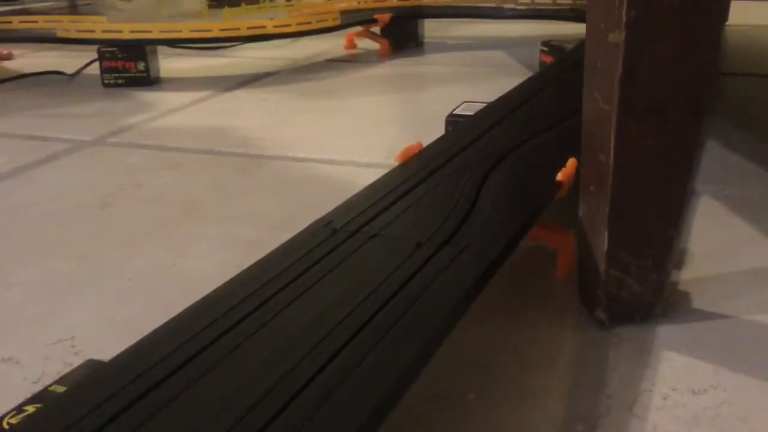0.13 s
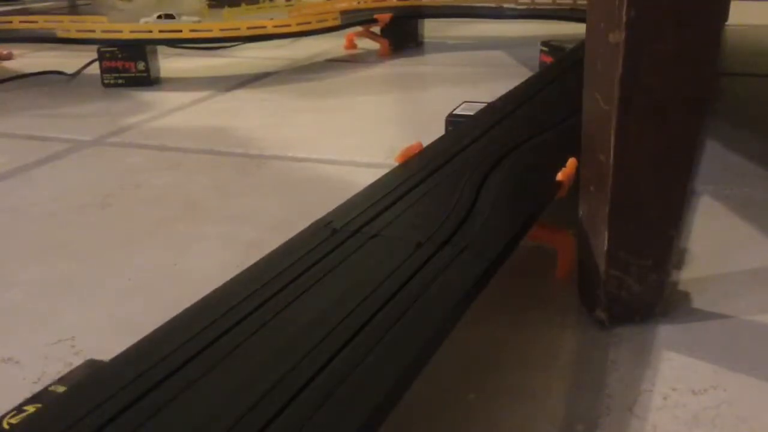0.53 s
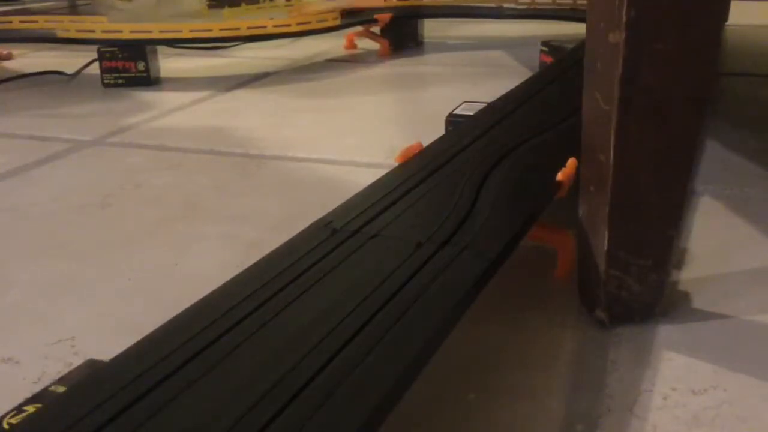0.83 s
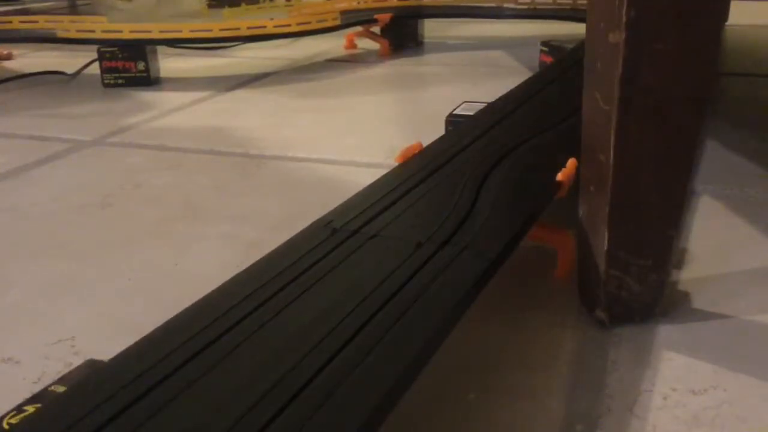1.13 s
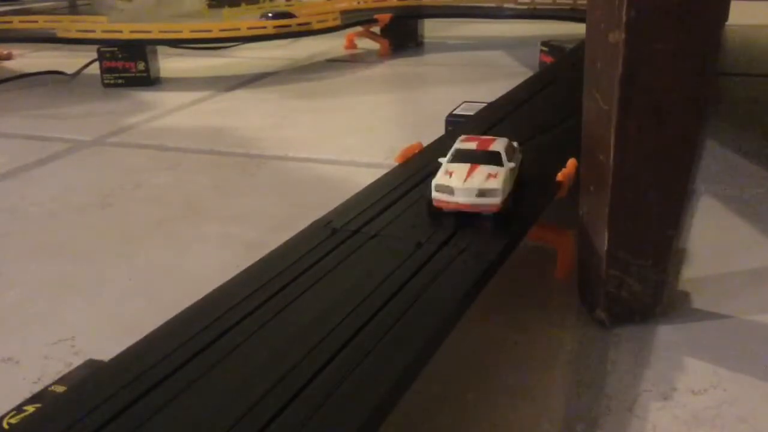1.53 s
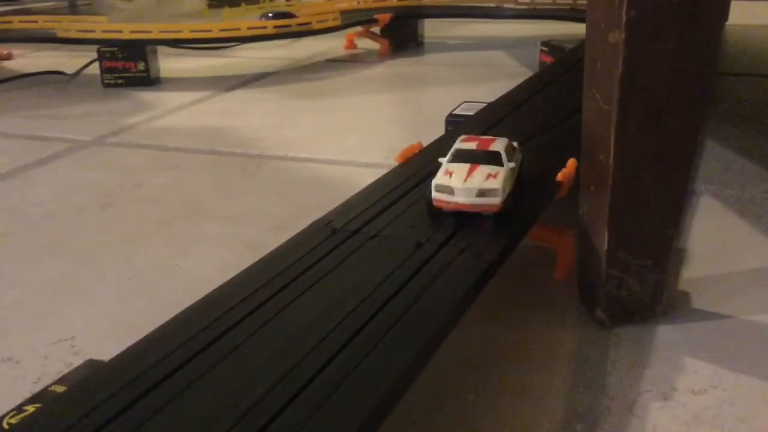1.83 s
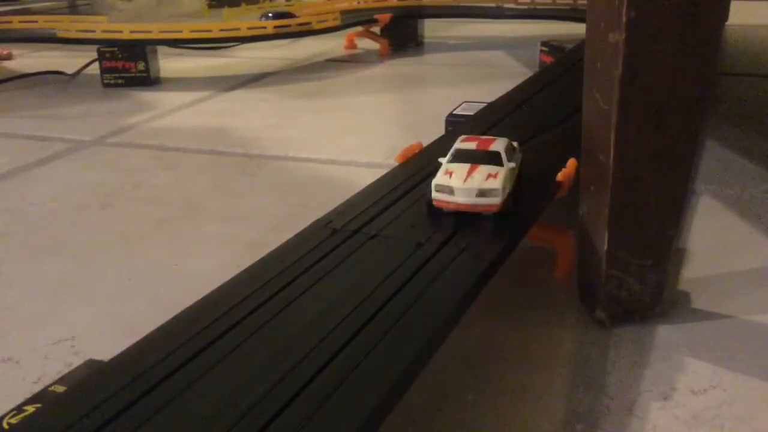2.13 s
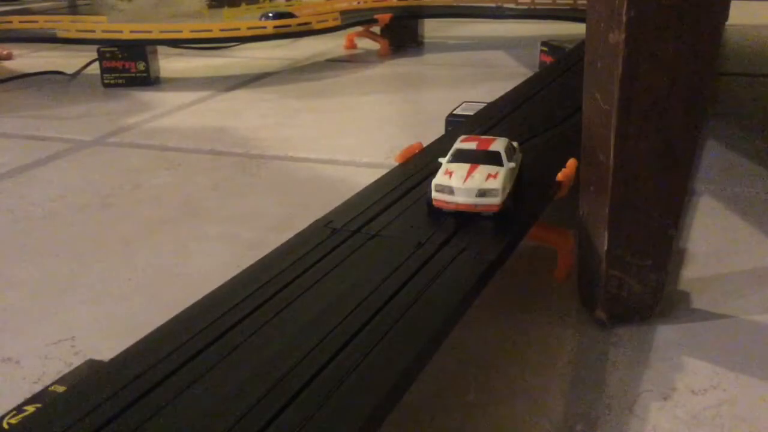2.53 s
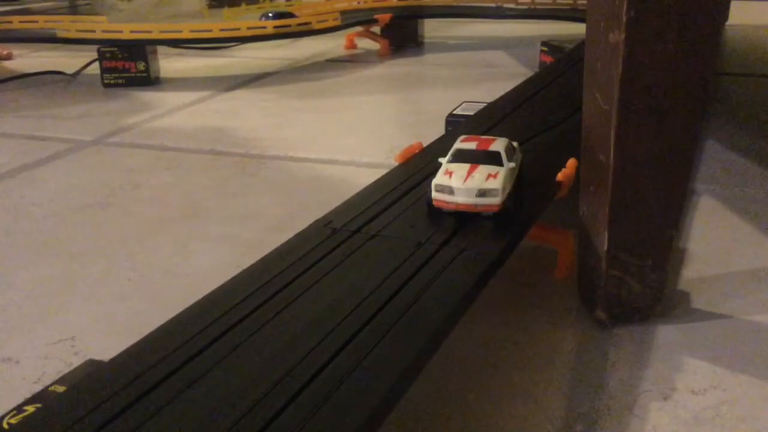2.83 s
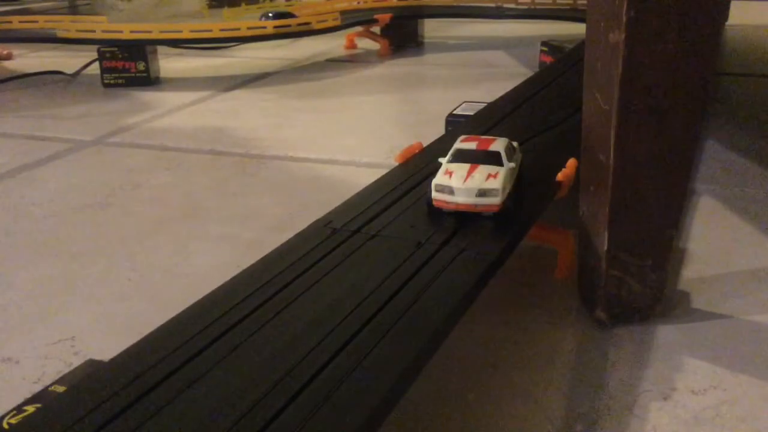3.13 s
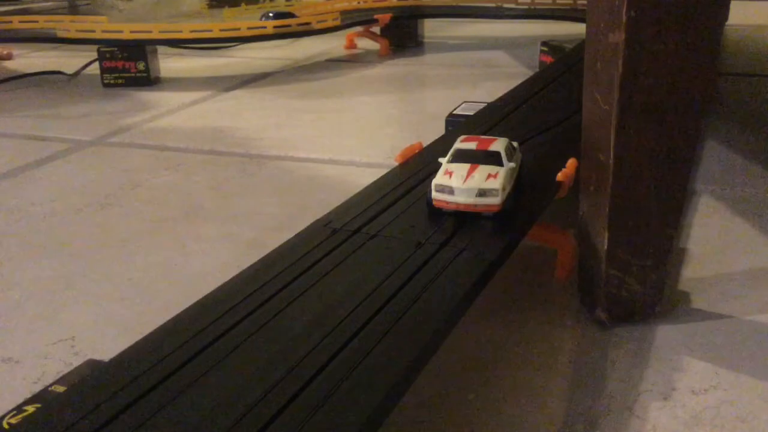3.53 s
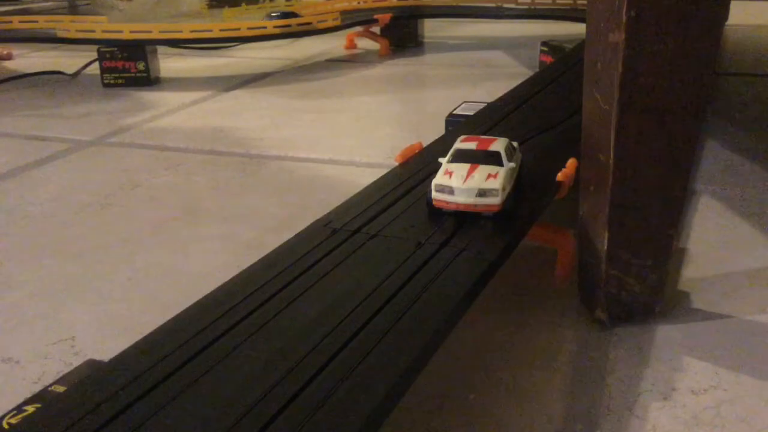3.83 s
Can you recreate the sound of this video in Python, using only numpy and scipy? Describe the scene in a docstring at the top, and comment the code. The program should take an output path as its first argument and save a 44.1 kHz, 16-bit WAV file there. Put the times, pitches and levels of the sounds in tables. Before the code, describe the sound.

Close by in a hard-floored room, small electric toy cars buzz, rasp and clatter along a track, dip for a moment, return, then halt, leaving low rumble and a late, very deep swelling hum.

```python
"""Toy slot cars race round a plastic track: random tiny impacts, filtered, make the rattle, rasp and hiss.
Motors hum and whine with tones and noise bands tied to one motor speed; short gliding tones sing, filtered
blows clack at the track joints, and a gritty noise scrubs once. The cars ease off briefly, speed up again and
coast to a halt. Then filtered noise leaves the room's low rumble, and a deep hum of gliding tones swells
towards the end."""
import sys
import numpy as np
from scipy import signal
from scipy.fft import rfft, irfft
from scipy.io import wavfile

SR = 44100
rng = np.random.default_rng(int(sys.argv[2]) if len(sys.argv) > 2 else 0)


def digitize_waveform(pressure):
    """Quantize a signal to 16-bit integers and store it at the path in sys.argv[1].

    Rows of a 2-D input are taken as channels; values are limited to [-1, 1].
    """
    field = np.atleast_2d(pressure).T
    bounded = np.clip(field, -1, 1)
    quanta = np.round(bounded * 32767).astype(np.int16)
    wavfile.write(sys.argv[1], SR, quanta)


N = 176400

# Tone colour of the hollow track's drumming and thuds: f/Hz, relative level/dB
TRACK_COLOUR = [(30,-59),(55,-43),(85,-23),(120,-22),(170,-14.5),(230,-4.5),(330,0.5),(450,-1),(650,-7),(1100,-15.5)]
# Tone colour of the pickup hiss and of the snap at a joint: f/Hz, relative level/dB
HISS_COLOUR = [(3000,-21.5),(5000,-6),(5700,1.5),(6200,2.5),(7100,2.5),(8400,0),(9700,-0.5),(11500,-4.5),(13200,0.5),(15500,-5)]


def from_db(db):
    """Turn decibels into a plain multiplier."""
    return 10 ** (np.asarray(db) / 20)


def rms_one(x):
    """Scale a signal to an rms (average strength) of 1."""
    return x / np.sqrt(np.mean(x ** 2) + 1e-20)


def in_time(rows):
    """Join the rows of a time table with straight lines; give each column at every sample."""
    s, *columns = np.transpose(rows)
    return [np.interp(np.arange(N) / SR, s, c) for c in columns]


def drift(rate_hz):
    """Slow random wander of spread 1: smoothed noise, made at every 40th sample and joined up."""
    r = np.exp(-80 * np.pi * rate_hz / SR)
    noise = rng.standard_normal(N // 40 + 2002)
    slow = signal.lfilter([1], [1, -2 * r, r * r], noise)[2000:]  # skip the filter's start-up
    return np.interp(np.arange(N) / 40, np.arange(len(slow)), rms_one(slow))


def colour(x, spectrum):
    """Filter a sound to a given spectrum, reacting without delay; white noise keeps its power."""
    size = 8192
    hz, db = np.transpose(spectrum)
    log_hz = np.log(np.maximum(np.arange(size // 2 + 1), 1) * SR / size)
    # Outside the table the response keeps falling
    beyond = np.maximum(log_hz - np.log(hz[-1]), 0) + np.maximum(np.log(hz[0]) - log_hz, 0)
    log_gain = np.log(from_db(np.interp(log_hz, np.log(hz), db))) - 2 * beyond
    # Folding the cepstrum puts the filter's energy as early as possible (minimum phase)
    cepstrum = irfft(log_gain)
    response = irfft(np.exp(rfft(2 * cepstrum[:size // 2], size)))
    return signal.fftconvolve(x, response / np.linalg.norm(response))[:N]


def ring(x, hz, t60_s):
    """Let a sound excite one resonance, which falls by 60 dB in t60_s."""
    r = np.exp(-np.log(1000) / (t60_s * SR))
    w = 2 * np.pi * hz / SR
    return signal.lfilter([0, np.sin(w)], [1, -2 * r * np.cos(w), r * r], x)


def cut(x, hz, kind, order=2):
    """Butterworth low-, high- or band-pass filter."""
    return signal.sosfilt(signal.butter(order, hz, kind, fs=SR, output="sos"), x)


def room(x, wet_db):
    """Add the room's short, slightly dull tail of decaying noise, keeping the total power about the same."""
    t60_s, wall_hz = 0.31, 6850
    t = np.arange(SR) / SR
    fading = np.exp(-np.log(1000) * t / t60_s) * (t > .004)  # the tail starts after 4 ms
    tail = cut(rng.standard_normal(SR) * fading, wall_hz, "low", order=1)
    wet = from_db(wet_db)
    echo = signal.fftconvolve(x, tail / np.linalg.norm(tail))[:N]
    return (x + wet * echo) / np.hypot(1, wet)


def contacts(turns, spread_db, judder_db):
    """Tiny impacts of tyres and pickups on the rails, bunched once per motor turn and in random judders."""
    contacts_per_s, turn_pulsing = 7000, .5  # average rate; how strongly it follows the turns
    hit = rng.random(N) < contacts_per_s / SR * (1 + turn_pulsing * np.cos(turns))
    spread = spread_db * np.minimum(rng.exponential(1, N), 3)
    judder = judder_db * np.clip(drift(90), -1.5, 1.5)
    return rms_one(hit * from_db(spread + judder) * rng.choice([-1, 1], N))


def running_levels():
    """Base levels in dB of rattle, drumming, rasp and hiss; they die away once the car stands still."""
    # Running noise: t/s, then base level/dB of the rattle, the track's drumming, the rasp, the pickup hiss
    running = [(0,-38.5,-47,-44.5,-44.5),(.09,-39,-47,-51.5,-51.5),(.2,-40.5,-42.5,-50.5,-52),(.29,-39,-46,-49.5,-52.5),(.37,-41,-46.5,-51,-48.5),(.44,-35,-46.5,-45,-47),(.505,-36.5,-50.5,-46.5,-47.5),(.535,-48,-54,-63,-52),(.59,-61,-52,-101,-78),(.66,-55,-50.5,-76,-75.5),(.73,-56.5,-57.5,-78,-70),(.78,-53.5,-57.5,-70.5,-65.5),(.808,-38,-53.5,-54,-54),(.85,-43,-53.5,-50.5,-57.5),(.92,-44,-47.5,-49,-55),(1.02,-38,-48,-55,-49),(1.1,-39.5,-51,-53,-54),(1.18,-38,-51.5,-50,-48),(1.25,-44.5,-46.5,-56.5,-59.5),(1.33,-42,-53,-52.5,-55),(1.405,-48.5,-50,-50.5,-57),(1.45,-53.5,-54,-58,-69),(1.51,-77,-59.5,-83,-85),(1.61,-71.5,-63.5,-82,-84)]
    stopped_s = np.maximum(np.arange(N) / SR - running[-1][0], 0)
    fall_db = 60 * np.minimum(stopped_s / 0.032, 1)
    return [db - fall_db for db in in_time(running)]


def rolling(turns):
    """The impacts shake the car body and the hollow track; the pickups rasp and hiss along the rails."""
    # Tone colour of the body's rattle: f/Hz, relative level/dB
    rattle_colour = [(300,-19.5),(600,-11.5),(800,-5.5),(1000,-6.5),(1200,-4),(1450,-6),(1750,-0.5),(2000,2.5),(2250,-2.5),(2600,-8),(3100,-18),(5000,-39)]
    # Tone colour of the pickups' rasp: f/Hz, relative level/dB
    rasp_colour = [(2300,-13.5),(2800,0),(3200,-6.5),(3700,4.5),(4050,-4),(4300,-1.5),(4700,-8.5),(5300,-18.5),(7000,-39.5)]
    # Low resonances of the track: f/Hz, relative level/dB, time to fall by 60 dB/s
    track_modes = [(84,-15,1),(181.2,-4.5,.7),(274,-6.5,.2),(347,-8,.3),(438,-2.5,0.46),(507,-5.5,.3)]
    # Added to the base levels, in dB; the hiss adds nothing
    rattle_trim, drum_trim, modes_trim, rasp_trim = -1, -4, -5, -1

    rattle_db, drum_db, rasp_db, hiss_db = running_levels()
    knocks = contacts(turns, spread_db=3.5, judder_db=2.5)
    scrapes = contacts(turns, spread_db=2.0, judder_db=2.0)
    drum_hits = contacts(turns, spread_db=1.5, judder_db=5.5)
    modes = np.zeros(N)
    for hz, db, t60_s in track_modes:
        modes += from_db(db) * rms_one(ring(rng.standard_normal(N), hz, t60_s))
    modes = rms_one(modes) * from_db(drum_db + modes_trim)
    body = colour(knocks * from_db(rattle_db + rattle_trim), rattle_colour)
    drum = colour(drum_hits * from_db(drum_db + drum_trim), TRACK_COLOUR)
    rasp = colour(scrapes * from_db(rasp_db + rasp_trim), rasp_colour)
    hiss = colour((knocks + scrapes) / np.sqrt(2) * from_db(hiss_db), HISS_COLOUR)
    return room(body + drum + rasp, wet_db=-9.5) + room(hiss, wet_db=-12) + modes


def gears(turns):
    """Loose teeth smear the mesh tones into narrow noise bands whose pitch follows the motor speed."""
    # Rough gear noise: multiple of the motor speed, width/Hz, relative level/dB
    gear_bands = [(6,390,1.5),(12,230,-5),(13,260,-8)]
    bands = np.zeros(N)
    for multiple, width_hz, db in gear_bands:
        slow_noise = cut(rng.standard_normal(N), width_hz / 2, "low", order=3)
        bands += from_db(db) * rms_one(slow_noise * np.cos(multiple * turns))
    rasp_db = running_levels()[2]
    return room(bands * from_db(rasp_db - 4), wet_db=-11)


def whir(turns, hum_db, flutter_db=2.5, wobble_db=3.0):
    """The unbalanced rotor hums once per turn; gears and commutator add a fluttering whine."""
    # Gear and commutator whine: multiple of the motor speed, level against the base rattle level/dB
    whine_orders = [(2,-19),(3,-13),(4,-17.5),(5,-9.5),(6,-8),(7,-13.5),(9,-23.5),(12,-21.5)]
    hum = from_db(hum_db + wobble_db * drift(27)) * np.sin(turns)
    whine = np.zeros(N)
    for multiple, db in whine_orders:
        flutter = from_db(db + flutter_db * drift(25))
        whine += flutter * np.sin(multiple * turns + rng.uniform(0, 2 * np.pi))
    rattle_db = running_levels()[0]
    return room(hum, wet_db=-11) + room(whine * from_db(rattle_db), wet_db=-9)


def room_rumble(split_hz=110):
    """Dull background noise, heaviest in the bass, built from separately levelled bands."""
    # Tone colour of the room's noise: f/Hz, relative level/dB
    room_colour = [(12, -27), (20, 2.5), (46, -9.5), (81, -25), (144, -18), (207, -30.5), (290, -30),
                   (539, -43.5), (716, -44), (771, -46.5), (1800, -53.5), (2340, -82.5), (3960, -120)]
    # Room rumble: t/s, level below 110 Hz/dB, level above/dB
    rumble_levels = [(0,-100,-76),(1.52,-90.5,-62),(1.57,-52.5,-54),(1.75,-53,-60),(2.05,-57.5,-63),(2.5,-57.5,-71),(3.0,-58,-68.5),(3.4,-57,-67),(3.6,-43.5,-64),(4,-55.5,-63.5)]
    low_db, high_db = in_time(rumble_levels)
    low, high, air = [colour(rng.standard_normal(N), room_colour) for _ in range(3)]
    low = rms_one(cut(low, split_hz, "low", order=4))
    high = rms_one(cut(cut(high, split_hz, "high", order=4), 420, "low"))
    air = rms_one(cut(cut(air, 450, "high"), 1900, "low", order=12))
    faint_hiss = from_db(-103) * rng.standard_normal(N)
    return low * from_db(low_db) + high * from_db(high_db) + air * from_db(-78.5) + faint_hiss


def singing(waver=0.0059, flutter_db=3.5):
    """Chassis and track sing briefly as the speed sweeps past a resonance: gliding tones swell and fade."""
    # Singing tones: start t/s, length/s, start f/Hz, end f/Hz, level before the flutter/dB
    sung_tones = [(.03,.13,900,890,-51.5),(.395,0.046,2039,1887,-37.5),(.422,0.035,1890,1740,-30.5),(.675,0.045,2295,2310,-56.5),(.76,0.084,431,405,-51),(0.877,.05,1760,1790,-42.5),(0.945,0.056,930,909.3,-46.5),(1.054,0.088,1196,1230,-43.5),(1.172,0.03,1980,1970,-37.5),(1.218,.16,738,710,-49.5),(1.325,.06,1820,1750,-46),(1.354,0.094,426,431.4,-47),(1.383,0.052,1557,1560,-47.5)]
    t, out = np.arange(N) / SR, np.zeros(N)
    wobble = 1 + waver * drift(45)
    for start, length, from_hz, to_hz, db in sung_tones:
        span = (t >= start) & (t < start + length)
        u = (t[span] - start) / length  # 0 to 1 through the tone
        hz = (from_hz + (to_hz - from_hz) * u) * wobble[span]
        swell = np.sqrt(2 * np.sin(np.pi * u))
        out[span] += from_db(db) * swell * np.sin(2 * np.pi * np.cumsum(hz) / SR)
    return room(out * from_db(flutter_db * drift(53)), wet_db=-18.5)


def joints():
    """Front and rear axle strike each joint: the shell snaps and chatters, and the hollow track thuds."""
    # A car crosses a joint: t/s, strength/dB, snap against strength/dB, thud against strength/dB
    crossings = [(.111,-11.5,2,-10),(.139,0.5,-3,-12.5),(.145,-3,-4,-10.5),(.309,-0.5,-5,-2),(.402,-6,1.5,-11.5),(.449,0,-13,-10.5),(0.471,-4,-5,-7.5),(.5,-3.5,-1.5,-10),(.808,-9,-0.5,-10),(0.88,-13,-1,-9.5),(1.011,-2,-8,-10.5),(1.052,-10,-7.5,-8),(1.1565,5.5,-3.5,-15),(1.224,-20.5,8,-5),(1.322,-17.5,3,-1)]
    # Tone colour of the clack: f/Hz, relative level/dB
    clack_colour = [(100,-34),(250,-7),(400,-7),(700,-12),(1000,1.5),(1300,-3),(1700,5.5),(2100,1),(3000,-14),(4300,-14),(5500,-23),(12000,-26)]
    clack_db, snap_db = -10.5, -15.5  # added to the strengths
    chatter_db, chatter_s = -17, .011  # level; time to fall to 37 %
    axle_gap_s, rear_axle_db = .0062, -9.5  # average gap; rear blow against the front one
    shell_ring_s = 0.0024  # time to fall to 37 %

    t = np.arange(SR // 8) / SR
    dull, bright, thud = np.zeros((3, N))
    for s, db, bright_db, thud_db in crossings:
        grains = rng.standard_normal(len(t)) * (rng.random(len(t)) < .3)
        blow = from_db(chatter_db) * grains * np.exp(-t / chatter_s)
        blow[0] += 1  # front axle
        blow[int(axle_gap_s * rng.uniform(.9, 1.1) * SR)] += from_db(rear_axle_db)
        i = int(s * SR)
        dull[i:i + len(t)] += from_db(db + clack_db) * blow
        thud[i:i + len(t)] += from_db(db + clack_db + thud_db) * blow
        bright[i:i + len(t)] += from_db(db + bright_db + snap_db) * blow
    shell = rng.choice([-1, 1], len(t)) * np.exp(-t / shell_ring_s)
    snap = signal.fftconvolve(bright, shell / np.linalg.norm(shell))[:N]
    clacks = colour(dull, clack_colour) + colour(thud, TRACK_COLOUR) + colour(snap, HISS_COLOUR)
    return room(clacks, wet_db=-6)


def skid(turns):
    """Tyres scrub through a bend: tiny impacts, filtered to a gritty noise, swell and fade."""
    # Loudness of the scrub: t/s, level/dB
    scrub_levels = [(.41,-61.5),(.445,-45),(.487,-35.5),(.505,-46),(.54,-70.5)]
    # Tone colour of the scrub: f/Hz, relative level/dB
    scrub_colour = [(2600,-18.5),(3300,-6.5),(3800,-1.5),(4400,1),(4800,-11.5),(5300,-21),(7000,-40)]
    t = np.arange(N) / SR
    grit = colour(contacts(turns, spread_db=3.5, judder_db=2.0), scrub_colour)
    sliding = (t > scrub_levels[0][0]) & (t < scrub_levels[-1][0])
    return room(grit * from_db(in_time(scrub_levels)[0]) * sliding, wet_db=-18)


def deep_hum(flutter_db=4.0, waver=0.013):
    """A very low hum, like a distant engine, rises in pitch and level, with a soft puff on every cycle."""
    # Deep hum: t/s, f/Hz, base level/dB
    hum_curve = [(3.0,25.85,-83),(3.45,26.93,-58.5),(3.56,27.54,-45),(3.7,31.02,-48),(3.82,33.3,-41),(4,33.5,-40)]
    # Its partials: multiple of the pitch, level against the base/dB; the first is the steady main tone
    hum_partials = [(1,0.5),(2,-21),(3,-25),(4,-22.5),(5,-20),(6.1,-25.5),(7.4,-25),(8.4,-29.5),(12.8,-34)]
    # A softer tone before the hum: t/s, level/dB
    drone_levels = [(2.9,-89.5),(3.2,-64.5),(3.45,-55.5),(3.58,-61),(4,-81.5)]
    drone_hz = 77.4  # average pitch
    puff_db, puff_band_hz = -29.5, (152, 293.4)

    hz, db = in_time(hum_curve)
    phase = 2 * np.pi * np.cumsum(hz) / SR
    main = from_db(hum_partials[0][1]) * np.sin(phase)
    upper = np.zeros(N)
    for multiple, level in hum_partials[1:]:
        flutter = from_db(level + flutter_db * drift(9.5))
        wavering_hz = hz * (1 + waver * drift(9.4))
        upper += flutter * np.sin(multiple * 2 * np.pi * np.cumsum(wavering_hz) / SR)
    puff_noise = cut(rng.standard_normal(N), puff_band_hz, "band")
    puffs = from_db(puff_db) * rms_one(puff_noise * (1 + np.sin(phase)) ** 2)
    drone_phase = 2 * np.pi * np.cumsum(drone_hz * (1 + waver * drift(15))) / SR
    drone = from_db(in_time(drone_levels)[0]) * np.sin(drone_phase)
    hum = from_db(db) * (main + upper + puffs) + drone
    fade_in = np.clip((np.arange(N) / SR - drone_levels[0][0]) * 10, 0, 1)  # over 0.1 s
    return np.sqrt(2) * hum * fade_in


def scene():
    """The cars on their track share one motor speed; the room's rumble and the deep hum surround them."""
    # Motor: t/s, average turns per second/Hz, level of the rotor's hum before its wobble/dB
    motor = [(0,313,-54),(.16,319,-50.5),(.19,300,-43),(.26,369,-42),(.36,357,-41.5),(.44,313,-45),(.53,300,-50),(.59,277,-49),(.65,279,-63),(.86,283,-63.5),(.93,335,-43),(1.0,347,-55.5),(1.12,340,-55.5),(1.22,340,-41),(1.27,331,-54),(1.35,303,-44.5),(1.42,266,-54),(1.48,250,-79),(1.6,205,-101)]
    speed_hz, hum_db = in_time(motor)
    turns = 2 * np.pi * np.cumsum(speed_hz * (1 + .008 * drift(30))) / SR  # motor angle in radians
    driving = np.arange(N) / SR < motor[-1][0]
    cars = rolling(turns) + gears(turns) + whir(turns, hum_db) * driving
    cars += singing() + joints() + skid(turns)
    return (cut(cars, 74, "high") + room_rumble() + cut(deep_hum(), 550, "low", order=4))[None]


def record(dry):
    """A steep low-pass filter removes the treble above 15.8 kHz."""
    return signal.sosfilt(signal.ellip(10, .1, 80, 15800, fs=SR, output="sos"), dry)


dry = scene()
out = record(dry)
digitize_waveform(out)
```